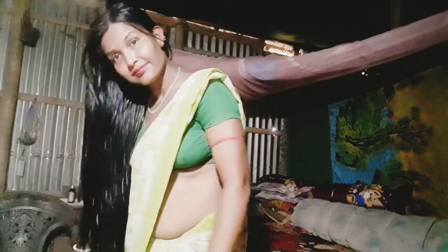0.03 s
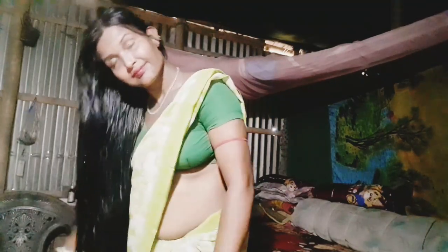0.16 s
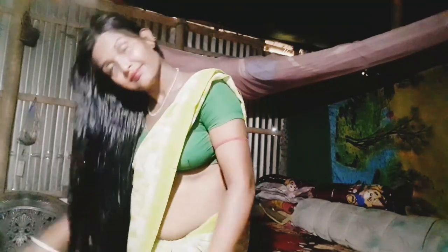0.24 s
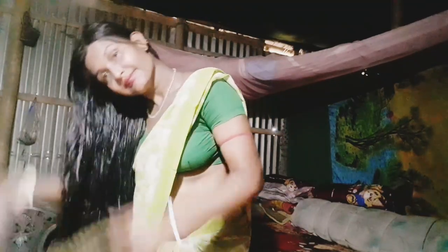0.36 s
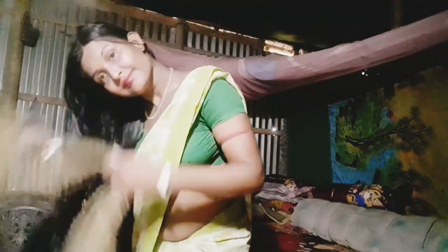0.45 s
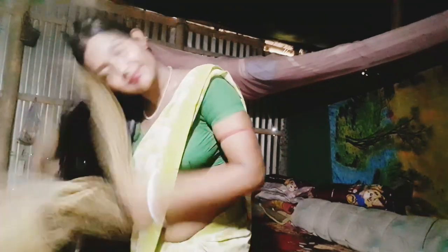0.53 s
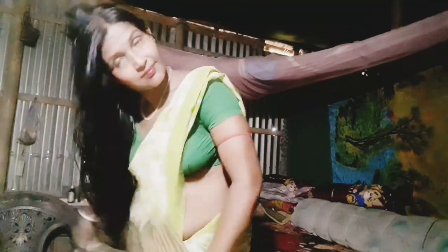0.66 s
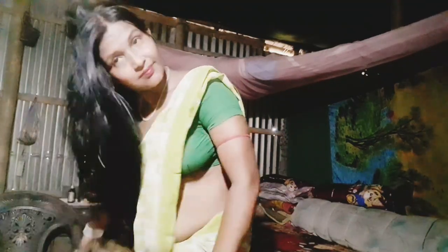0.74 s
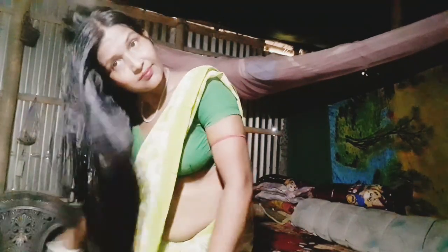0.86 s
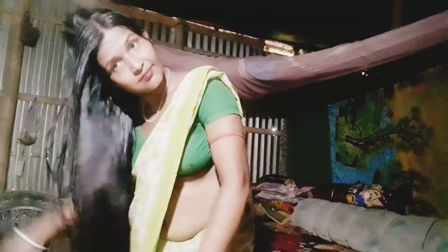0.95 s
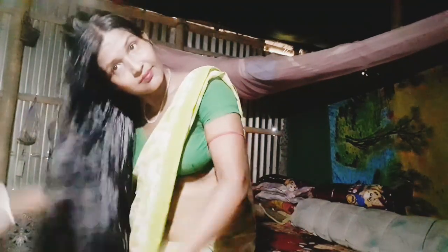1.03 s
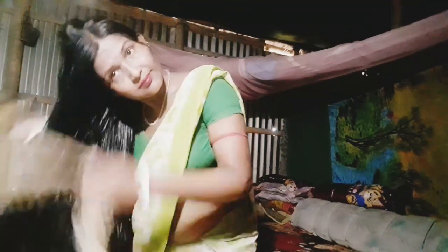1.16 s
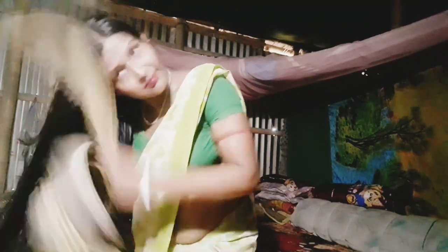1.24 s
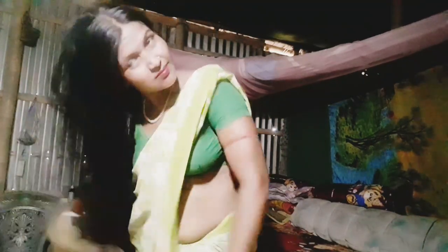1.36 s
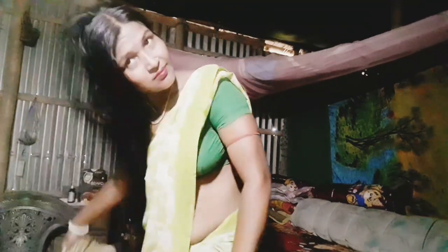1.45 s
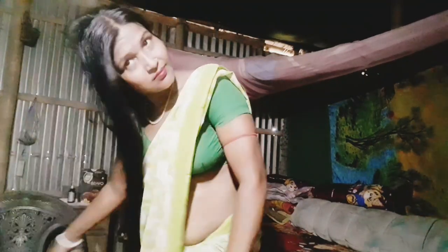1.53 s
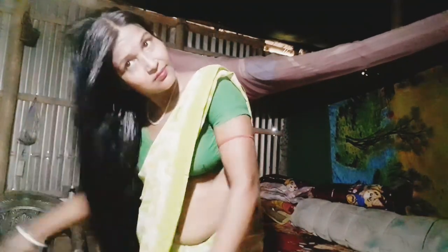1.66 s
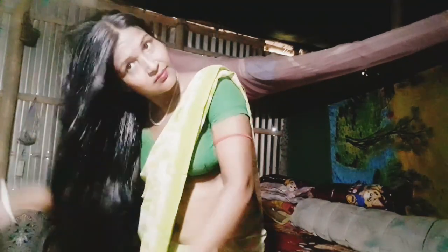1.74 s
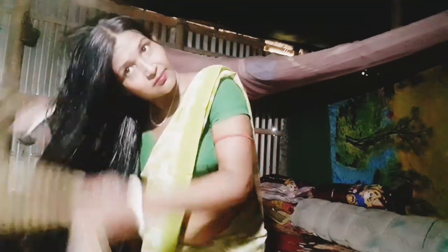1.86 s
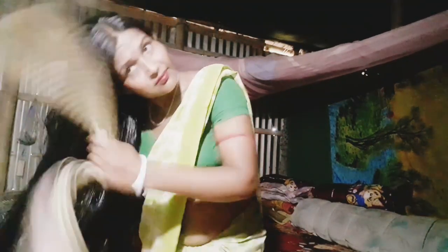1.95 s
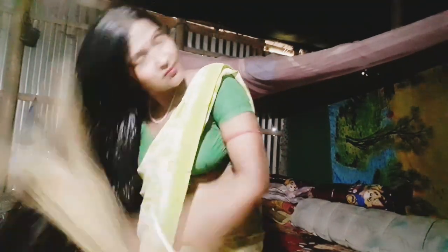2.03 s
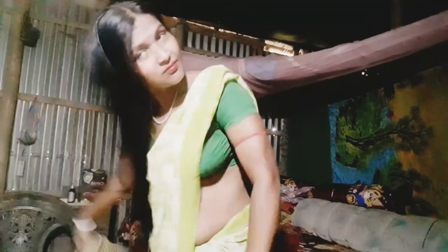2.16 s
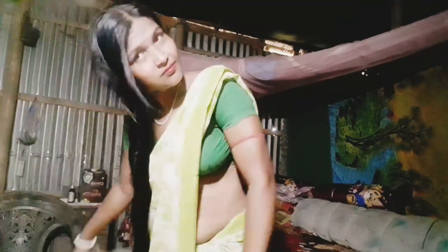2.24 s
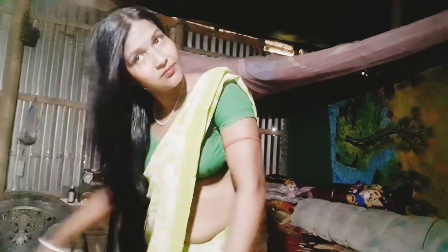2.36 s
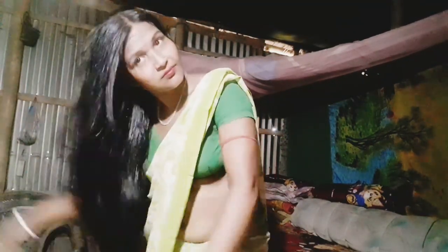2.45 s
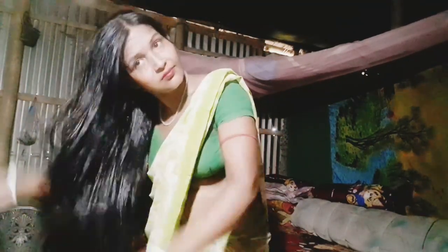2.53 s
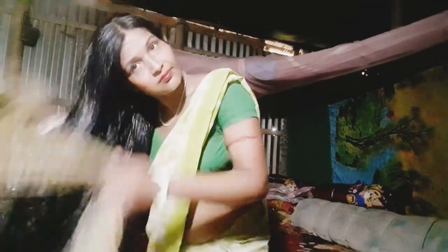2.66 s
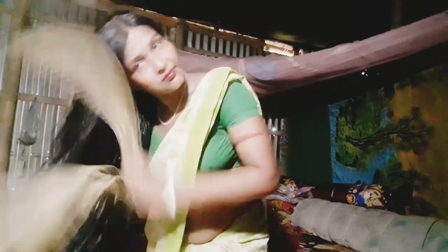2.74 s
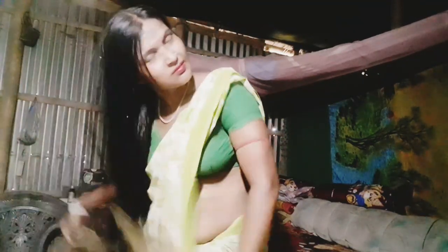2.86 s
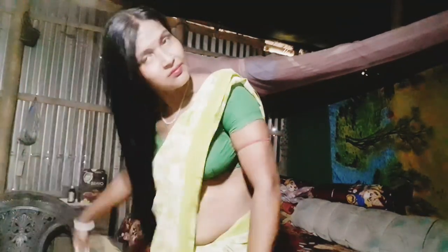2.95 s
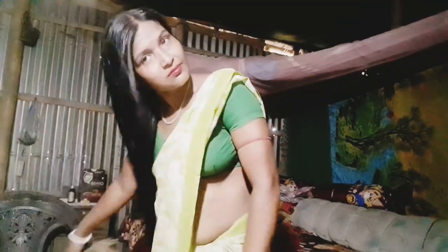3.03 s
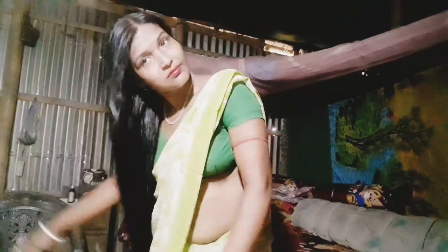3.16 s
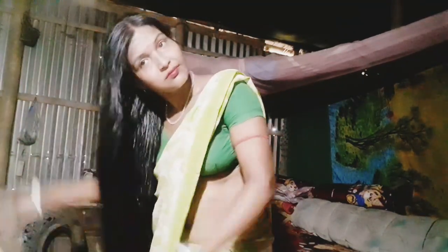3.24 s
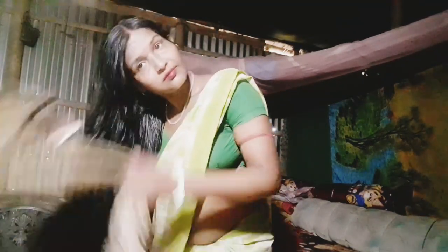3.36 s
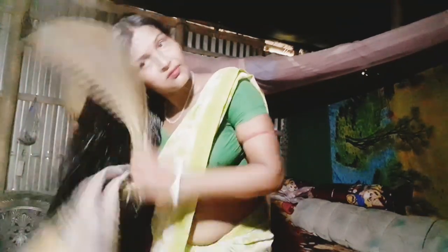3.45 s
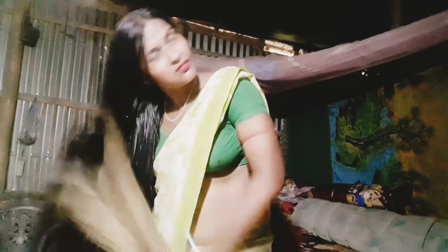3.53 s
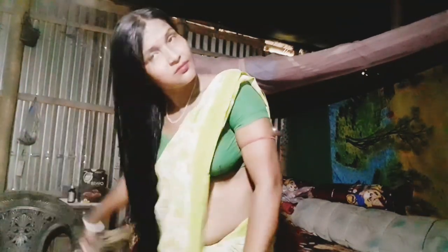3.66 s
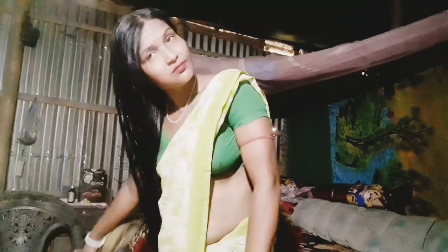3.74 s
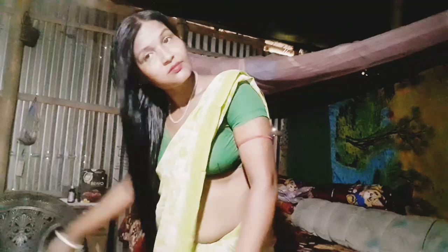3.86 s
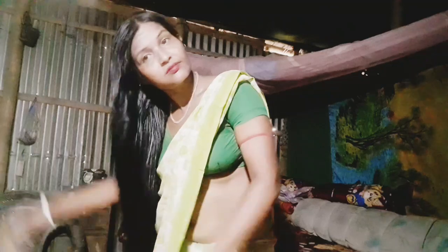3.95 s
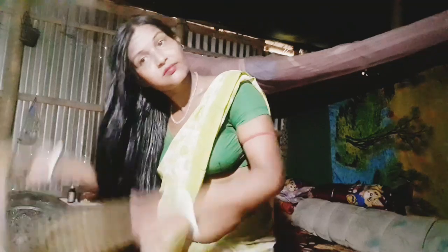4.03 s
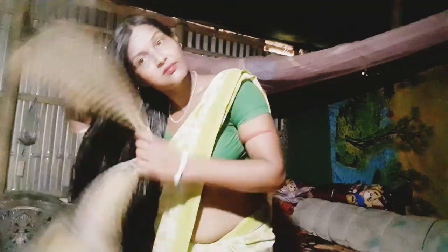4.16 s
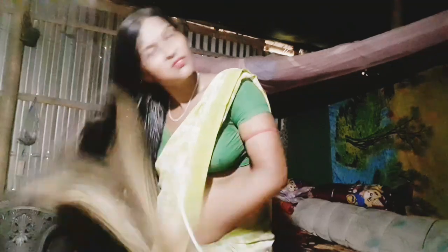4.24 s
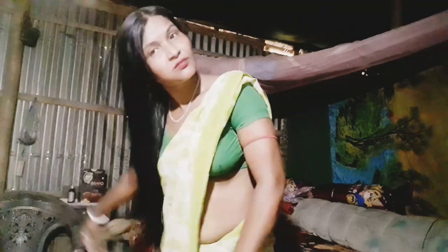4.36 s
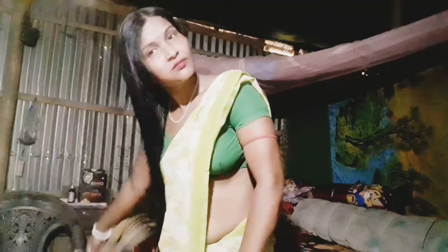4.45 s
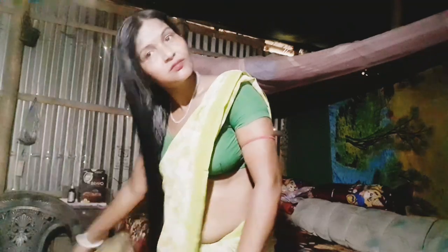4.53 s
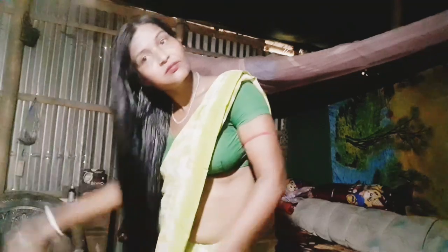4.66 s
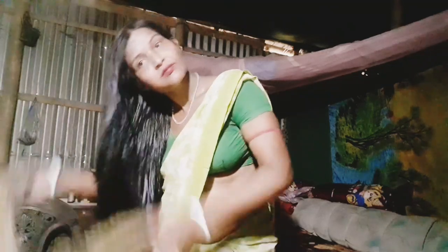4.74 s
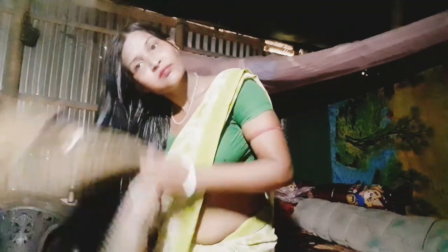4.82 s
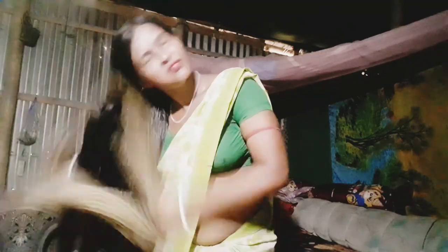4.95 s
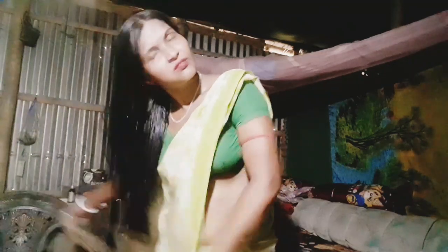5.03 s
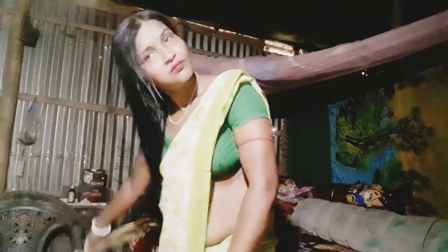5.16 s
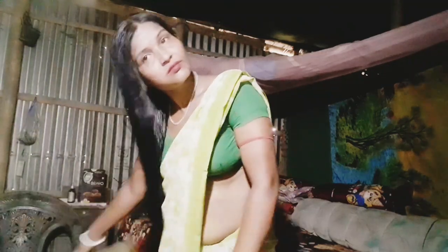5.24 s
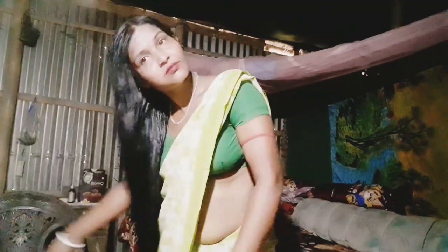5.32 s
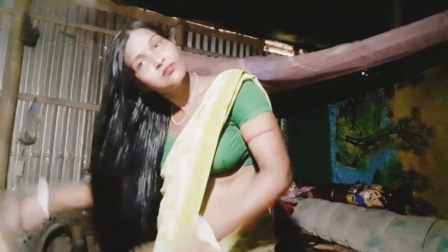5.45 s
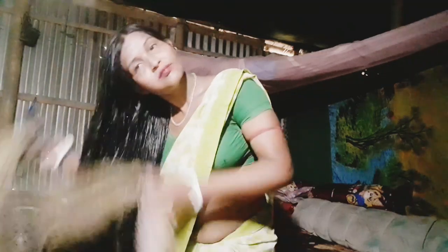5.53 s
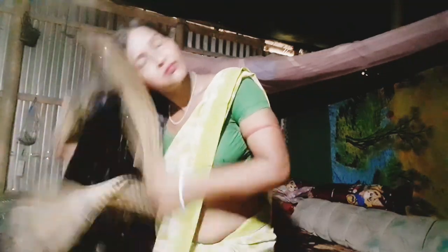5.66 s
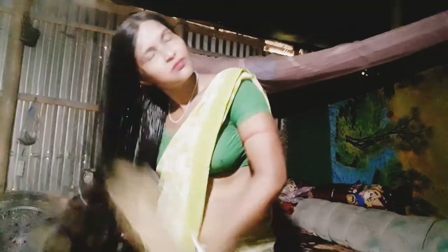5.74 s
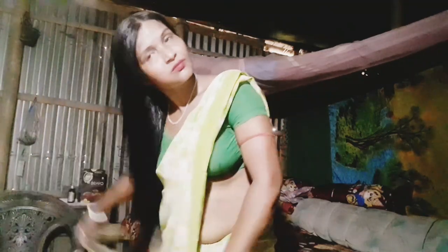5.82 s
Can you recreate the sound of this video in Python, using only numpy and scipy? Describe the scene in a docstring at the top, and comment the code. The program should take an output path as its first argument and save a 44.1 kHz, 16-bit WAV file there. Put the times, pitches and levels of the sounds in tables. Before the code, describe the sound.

In a small hard-walled room, a cloth beats long wet hair eight times, about every 0.7 seconds. Each stroke is a soft low flap, a quick swish, then a crisp, spitting wet slap with tiny crackles. A low fan hum throbs beneath, with a faint high insect rasp and thin hiss. Close microphone, short bright reflections.

```python
"""Beating wet hair dry

Long wet hair is beaten with a cloth, eight strokes, in a small tin-walled room at night.
Each stroke: the cloth flaps taut (pulse, folds), swishes (shaped noise) and lashes the hair (tiny wet clicks).
A fan hums and throbs throughout (tones over noise), an insect rasps faintly, very high (narrow noise bands),
and a faint hiss lies under it all."""
import sys
import numpy as np
from scipy import signal
from scipy.fft import rfft, irfft, next_fast_len
from scipy.io import wavfile

SR = 44100
rng = np.random.default_rng(int(sys.argv[2]) if len(sys.argv) > 2 else 0)


def inscribe(sig):
    """Save sig as 16-bit PCM at rate SR to the path in sys.argv[1].

    A 1-D sig is mono; a 2-D sig holds one channel per row.
    Samples are clipped to [-1, 1] before scaling.
    """
    pcm = np.round(np.clip(np.atleast_2d(sig).T, -1, 1) * 32767)
    wavfile.write(sys.argv[1], SR, pcm.astype(np.int16))


N = 259749
T = np.arange(N) / SR  # seconds

# Swings of the cloth. Each row: flaps taut in seconds, lands in seconds, pop in dB, swing in dB, lash in dB,
# lash rise in seconds, lash fall in seconds, treble tilt in dB, hair ends in dB re the lash, puff of air in dB.
STROKES = [(.514, 0.593, -29.5, -36.5, -16, 0.0078, 0.021, -1.5, -9, -60),
           (1.238, 1.331, -31.5, -37.5, -20.5, 0.0045, .031, 0, -7, -53),
           (1.964, 2.067, -43.5, -43.5, -26, 0.0041, 0.037, -5.5, -9.5, -52),
           (2.74, 2.83, -29.5, -36, -22, 0.011, 0.036, -4, -2, -64),
           (3.446, 3.542, -35, -37, -16.5, 0.0028, 0.042, -4, -11, -55),
           (4.167, 4.263, -32.5, -37.5, -24, 0.007, 0.022, 1.5, -4, -62),
           (4.888, 4.981, -29, -35, -25.5, 0.011, 0.015, 0, -3, -58),
           (5.616, 5.711, -32, -34.5, -21, 0.009, 0.015, -1, -2, -70)]
# Spectrum of clicking wet strands. Each row: frequency in Hz, relative level in dB.
SPRAY = [(60, -27.5), (400, -49.5), (1300, -17.5), (2100, -11), (3300, -3.5), (4800, -3), (6300, 0.5),
         (7200, -4.5), (8200, -14.5), (9300, -13), (10500, -5.5), (11800, -3), (15500, -1.5)]
# Spectrum of cloth moving through air. Each row: frequency in Hz, relative level in dB.
SWISH = [(100, -4), (700, -2.5), (2000, -8.5), (3500, 1), (5000, 1.5), (6700, 1), (8300, -19.5),
         (10500, -10.5), (12000, -14), (15500, -18)]
# Level of the background air noise. Each row: time in seconds, level in dB.
BACKGROUND = [(0.0, -53), (0.61, -53), (0.92, -55), (1.33, -53.5), (1.72, -58.5), (2.64, -57.5),
              (2.87, -50), (3.23, -54.5), (3.41, -51.5), (3.9, -56.5), (4.62, -55.5), (4.97, -53),
              (5.38, -55), (5.89, -52.5)]


def amp(db):
    """Decibels to gain."""
    return 10 ** (np.asarray(db) / 20)


def unit(x):
    """Scales to rms 1."""
    return x / np.sqrt(np.mean(x ** 2) + 1e-20)


def read(points, hz):
    """Reads a table on a log-frequency axis."""
    f, value = np.transpose(points)
    return np.interp(np.log(hz + 1), np.log(f + 1), value)


def colour(x, points):
    """Causal minimum-phase filter with the given spectrum; white input keeps its power."""
    size = 4096
    hz = abs(np.fft.fftfreq(size, 1 / SR))
    gain = amp(np.maximum(read(points, hz), -100))
    response = np.conj(np.exp(signal.hilbert(np.log(gain))))
    taps = np.fft.ifft(response).real[:size // 2]
    return signal.oaconvolve(x, taps / np.linalg.norm(taps))[:N]


def noise():
    """White noise of rms 1."""
    return rng.standard_normal(N)


def wander(rate_hz):
    """Smooth random motion of rms 1, up to about the given rate."""
    size = next_fast_len(N)
    hz = np.fft.rfftfreq(size, 1 / SR)
    spectrum = rfft(rng.standard_normal(size)) * np.exp(-(hz / rate_hz) ** 2)
    return unit(irfft(spectrum, size)[:N])


def burst(s, rise, fall, shape=1):
    """Grows exponentially up to time s, then dies away; a shape above 1 holds longer and ends sooner."""
    before = np.maximum(s - T, 0) / rise
    after = (np.maximum(T - s, 0) / fall) ** shape
    return np.exp(-np.minimum(before + after, 20))


def grains(per_s, spread_db, clump_db):
    """Dense tiny clicks of uneven size that come in clumps, rms 1."""
    clicks = np.sign(noise()) * (rng.random(N) < per_s / SR)
    size_db = spread_db * np.clip(noise(), -2, 2)
    size_db += clump_db * np.clip(wander(rate_hz=378), -2, 2)
    return unit(clicks * amp(size_db))


def lashes():
    """The swish peaks just before landing; then strands click together and the mass of hair thuds."""
    # Spectrum of the thud. Each row: frequency in Hz, relative level in dB.
    thud_spectrum = [(40, -40), (110, -5), (220, -1), (340, 3), (450, -2), (560, 1.5), (720, -1),
                     (1350, 0.5), (2000, -10), (4000, -31), (9000, -50.5)]
    swish_lead_s, swish_rise_s, swish_fall_s = 0.012, 0.027, 0.035
    ends_delay_s, ends_rise_s, ends_fall_s, ends_tilt_db = 0.03, 0.012, 0.031, -4.5
    # the thud grows more slowly than the spray: level for a 0 dB lash, and dB per dB of lash
    thud_db, thud_growth = -23.5, 0.66

    spray_power, bright_power, swish, thud_power = np.zeros((4, N))
    for _, s, _, swing_db, lash_db, rise_s, fall_s, tilt_db, ends_db, _ in STROKES:
        swish += amp(swing_db) * burst(s - swish_lead_s, swish_rise_s, swish_fall_s)
        mass = (s, lash_db, rise_s, fall_s, tilt_db)
        ends = (s + ends_delay_s, lash_db + ends_db, ends_rise_s, ends_fall_s, tilt_db + ends_tilt_db)
        for at, db, rise, fall, treble_db in (mass, ends):
            contact = burst(at, rise, fall, shape=1.55)
            blow = burst(at, rise * 0.97, fall * 1.21, shape=1.2)
            # overlapping contacts add in power
            spray_power += (amp(db) * contact) ** 2
            bright_power += (amp(db + treble_db) * contact) ** 2
            thud_power += (amp(thud_db + thud_growth * db) * blow) ** 2

    strands = grains(per_s=15000, spread_db=4.5, clump_db=2.2)
    treble = signal.sosfiltfilt(signal.butter(2, 8500, "high", fs=SR, output="sos"), strands)
    wet = np.sqrt(spray_power) * (strands - treble) + np.sqrt(bright_power) * treble
    thud = np.sqrt(thud_power) * grains(per_s=4000, spread_db=2.5, clump_db=0.5)
    return colour(wet, SPRAY) + colour(swish * noise(), SWISH) + colour(thud, thud_spectrum)


def snaps(count):
    """More cracks at random after each landing, on average weaker the later: peak s, level dB, length s."""
    window_s, length_s = 0.045, 0.00034
    level_db, spread_db, fade_db = 2.5, 2.5, 10  # level re the lash; fade over the window
    rows = []
    for _, s, _, _, lash_db, *_ in STROKES:
        for late, size in zip(rng.random(count), rng.uniform(-1.1, 1, count)):
            db = lash_db + level_db + spread_db * size - fade_db * late
            rows.append((s + late * window_s, db, length_s))
    return rows


def cracks():
    """A wet lock whips over: a dense knot of clicks that grows and dies within milliseconds."""
    # Cracks at set times. Each row: peak in seconds, level in dB, rise and fall time in seconds.
    set_cracks = [(0.583, -16.5, .0012), (0.602, -16.5, 0.0013), (1.3333, -8.5, 0.001),
                  (2.072, -22, 0.0015), (2.84, -27, 0.00046), (3.537, -20, 0.00059), (3.551, -12, 0.00019),
                  (4.259, -15, 0.0004), (5.7045, -15, 0.0011)]
    knots = np.zeros(N)
    for s, db, length_s in [*set_cracks, *snaps(count=3)]:
        knots += amp(db) * burst(s, rise=length_s, fall=length_s)
    return colour(knots * np.sign(noise()), SPRAY)


def flaps():
    """The cloth jerks taut: a pressure pulse, a low rattle of folds, a flutter, then a fine sizzle."""
    # Spectrum of the pop. Each row: frequency in Hz, relative level in dB.
    pop_spectrum = [(40, -38.5), (120, 0), (280, 3.5), (540, 6.5), (800, 0.5), (1300, -1), (2000, -14),
                    (4000, -37.5), (7000, -27), (9000, -40)]
    flutter_db, sizzle_db = -4.5, -18  # re the swing

    pulse, folds, flutter, sizzle = np.zeros((4, N))
    for s, _, pop_db, swing_db, *_ in STROKES:
        pulse[round(s * SR)] -= amp(pop_db + 18)
        folds += amp(pop_db - 7) * burst(s, rise=0.0006, fall=0.013)
        flutter += amp(swing_db + flutter_db) * burst(s, rise=0.0026, fall=0.016)
        sizzle += amp(swing_db + sizzle_db) * burst(s, rise=0.003, fall=0.078, shape=2)

    rattle = folds * grains(per_s=7700, spread_db=0, clump_db=6.5)
    fizz = sizzle * grains(per_s=15000, spread_db=4, clump_db=1.2)
    return colour(pulse + rattle, pop_spectrum) + colour(flutter * noise(), SWISH) + colour(fizz, SPRAY)


def puffs():
    """Low pushes of air from the swinging cloth: one at the flap, a stronger one before the landing."""
    # Spectrum of the push. Each row: frequency in Hz, relative level in dB.
    puff_spectrum = [(18, -31.5), (30, -13), (42, -12.5), (65, 2), (100, 0.5), (200, -20), (600, -62.5)]
    lead_s, flap_db = 0.034, -6  # flap level re the puff
    push = np.zeros(N)
    for flap_s, land_s, *_, db in STROKES:
        push += amp(db + flap_db) * burst(flap_s, rise=0.011, fall=0.036, shape=2)
        push += amp(db) * burst(land_s - lead_s, rise=0.015, fall=0.07, shape=1.6)
    return push * colour(noise(), puff_spectrum)


def rustles():
    """Soft swells of sliding fabric and moved air as the cloth is gathered, and a few dull knocks."""
    # Gathering of the cloth. Each row: peak in seconds, fall in seconds, fabric hiss in dB, moved air in dB.
    gathers = [(0.275, 0.16, -61.5, -62), (.884, 0.048, -77, -53), (3.427, 0.056, -56, -49),
               (4.104, 0.036, -63, -52), (4.785, .055, -64.5, -49.5), (5.387, .08, -67, -53),
               (5.5, 0.059, -69.5, -51.5)]
    # Soft knocks of loose folds. Each row: peak in seconds, level in dB.
    fold_knocks = [(2.796, -37.5), (3.403, -41.5), (4.774, -48)]
    # Spectrum of moved air and knocks. Each row: frequency in Hz, relative level in dB.
    sweep_spectrum = [(80, -13.5), (250, 3.5), (600, 5.5), (1000, -1), (1500, -10), (2300, -9.5),
                      (2900, -35), (8000, -42)]

    fabric, air, knocks = np.zeros((3, N))
    for s, fall_s, fabric_db, air_db in gathers:
        swell = burst(s, rise=0.013, fall=fall_s, shape=2)
        fabric = np.maximum(fabric, amp(fabric_db) * swell)
        air = np.maximum(air, amp(air_db) * swell)
    for s, db in fold_knocks:
        knocks += amp(db) * burst(s, rise=0.001, fall=0.0032)
    threads = grains(per_s=20000, spread_db=3, clump_db=0.8)
    return colour(fabric * threads, SWISH) + colour((air + knocks) * noise(), sweep_spectrum)


def fan():
    """Rushing air and a wavering motor hum that throbs as the blades pass."""
    # Spectrum of the rushing air. Each row: frequency in Hz, relative level in dB.
    air_spectrum = [(28, -35), (45, -14.5), (90, -11.5), (150, -8.5), (200, 2), (260, -7.5), (350, -7.5),
                    (480, -12), (1000, -11.5), (1550, -18), (1850, -24.5), (2400, -28.5), (2900, -38),
                    (8000, -56.5)]
    # Motor hum. Each row: frequency in Hz, level in dB re the background table, blade throb depth (0 to 1).
    hum_tones = [(100.4, -9.5, 0.25), (197.7, -3, 1), (311.6, -13.5, .3), (359.7, -12, 0.51),
                 (544, -16, 0.45)]
    blade_hz, air_db = 14, 3  # air level re the background table

    background_db = np.interp(T, *np.transpose(BACKGROUND))
    blades = np.cos(2 * np.pi * blade_hz * T + 2 * wander(rate_hz=3.8))
    hum = np.zeros(N)
    for hz, db, depth in hum_tones:
        tone = np.cos(2 * np.pi * hz * T + 1.28 * wander(rate_hz=8.7))
        waver_db = wander(rate_hz=8.3)
        hum += amp(db + waver_db) * unit(tone * (1 + depth * blades))

    # the hum varies less than the air noise
    motor_db = background_db - 0.2 * (background_db - background_db.mean())
    flicker_db = 0.42 * wander(rate_hz=13)
    air = amp(background_db + air_db + flicker_db) * colour(noise(), air_spectrum)
    return air + amp(motor_db) * hum


def insect():
    """A rasping wing drives a few narrow, very high resonances; weak rasps sit higher in pitch."""
    # Rasps, about four a second. Each row: middle in seconds, level in dB.
    chirps = [(.16, -61.5), (.39, -61.5), (.66, -66), (.88, -68), (.97, -75), (1.19, -77.5), (1.49, -71.5),
              (1.77, -69), (1.99, -68.5), (2.25, -70), (2.49, -70), (2.72, -65), (3.13, -68), (3.27, -76.5),
              (3.83, -73), (4.04, -67), (4.51, -65.5), (4.74, -67), (5.27, -69), (5.5, -66), (5.84, -66)]
    # Wing resonances. Each row: factor on the pitch, half width in Hz, relative level in dB.
    wing = [(1.015, 120, -1), (.983, 50, -5), (.96, 70, -15.5), (1.0, 650, -0.5)]
    chirp_s, chirp_hz, drift_hz = 0.21, 10130, 40
    weak_below_db, weak_hz_per_db, bed_db = -71.5, 53, -81.5

    level = np.zeros(N)
    for s, db in chirps:
        arch = np.cos(np.pi * np.clip((T - s) / chirp_s, -0.5, 0.5)).clip(0) ** 0.8
        level = np.maximum(level, amp(db) * arch)

    effort_db = np.interp(T, *np.transpose(chirps))
    weakness_db = np.maximum(weak_below_db - effort_db, 0)
    pitch_hz = chirp_hz + weak_hz_per_db * weakness_db + drift_hz * wander(rate_hz=2.7)
    phase = 2 * np.pi * np.cumsum(pitch_hz) / SR
    rasp = np.zeros(N)
    for factor, width_hz, db in wing:
        in_phase = wander(width_hz) * np.cos(factor * phase)
        quadrature = wander(width_hz) * np.sin(factor * phase)
        rasp += amp(db) * (in_phase + quadrature)
    return (level + amp(bed_db)) * unit(rasp)


def hiss():
    """Faint high noise, rising and falling almost as much as the background air noise."""
    # Spectrum of the hiss. Each row: frequency in Hz, relative level in dB.
    hiss_spectrum = [(1000, -39), (2500, -7.5), (4000, 0.5), (5500, 2.5), (6800, 0.5), (8300, -19),
                     (11000, -2.5), (13000, -10), (15500, -3)]
    background_db = np.interp(T, *np.transpose(BACKGROUND))
    level_db = -68 + 0.83 * (background_db - background_db.mean())
    return amp(level_db) * colour(noise(), hiss_spectrum)


def room(x):
    """Close walls: dense reflections after 5 ms, each band dying at its own speed."""
    # Reverberation. Each row: frequency in Hz, time to fall by 60 dB in seconds.
    decay_times = [(150, 0.19), (700, 0.14), (3000, 0.3), (6000, 0.25), (12000, 0.22), (16000, 0.23)]
    size = SR // 2
    taps = rng.standard_normal(size) * (rng.random(size) < 4000 / SR)
    taps *= np.arange(size) > 0.005 * SR
    hz, t, bands = signal.stft(taps, SR, nperseg=256)
    decay_db = -60 * t / read(decay_times, hz)[:, None]
    tail = signal.istft(bands * amp(decay_db), SR, nperseg=256)[1]
    return signal.oaconvolve(x, tail / np.linalg.norm(tail))[:N]


def scene():
    """The strokes with a wall echo and the room, over puffs, fan, insect and hiss."""
    wall_delay_s = 0.0093  # nearest wall
    strokes = lashes() + cracks() + flaps() + rustles()
    wall = np.interp(T - wall_delay_s, T, strokes, left=0)
    reflected = amp(-18) * wall + amp(-15.5) * room(strokes)
    return (strokes + reflected + puffs() + fan() + insect() + hiss())[None]


def record(dry):
    """The microphone loses the deepest bass; then a steep low-pass limits the band."""
    edge_hz = 15850
    thin = signal.sosfilt(signal.butter(3, 36, "high", fs=SR, output="sos"), dry)
    low_pass = signal.firwin(511, edge_hz, window=("kaiser", 9), fs=SR)
    return signal.oaconvolve(thin, low_pass[None], "same")


dry = scene()
out = record(dry)
inscribe(out)
```